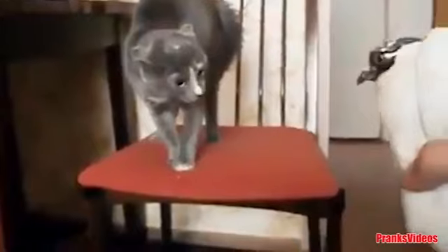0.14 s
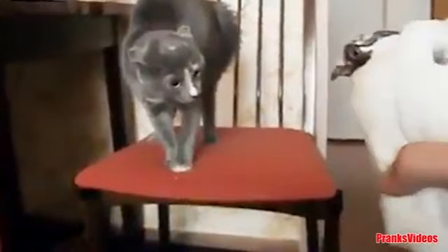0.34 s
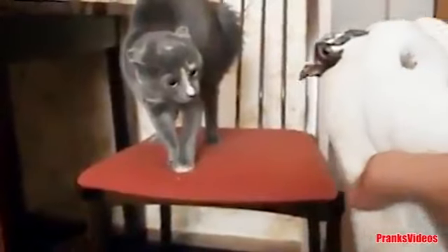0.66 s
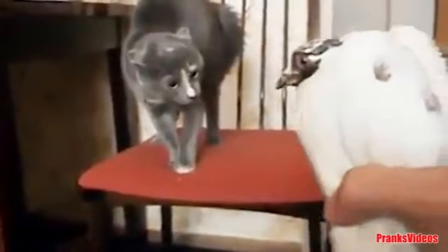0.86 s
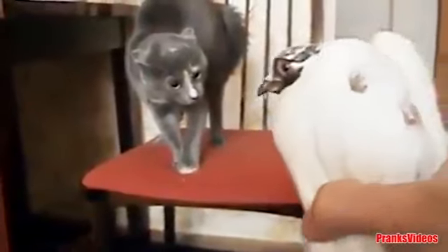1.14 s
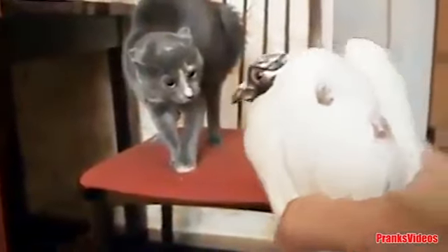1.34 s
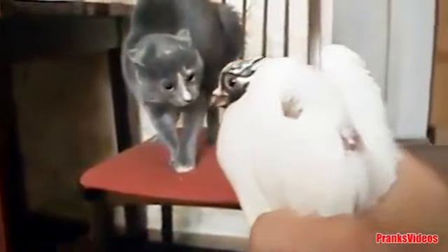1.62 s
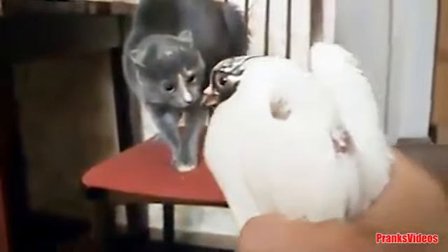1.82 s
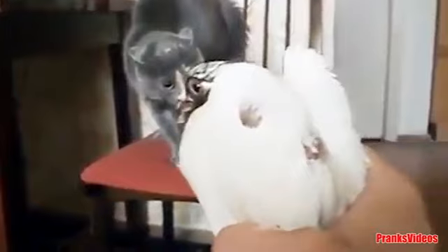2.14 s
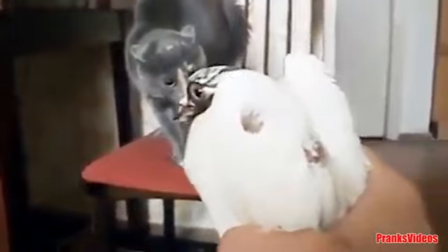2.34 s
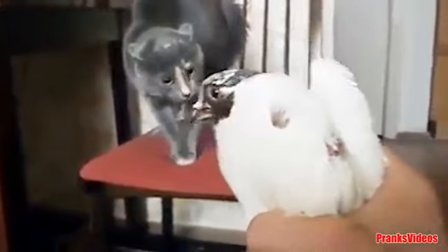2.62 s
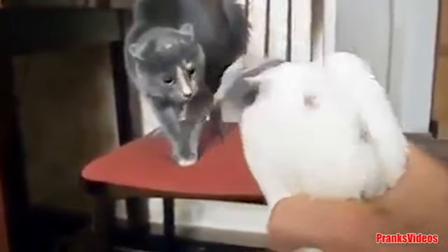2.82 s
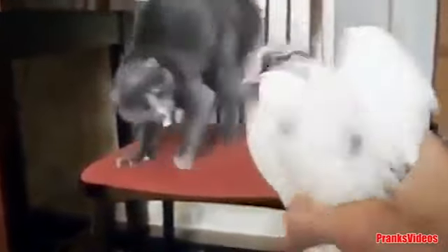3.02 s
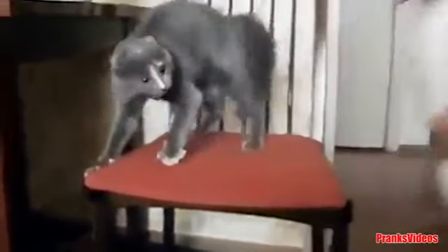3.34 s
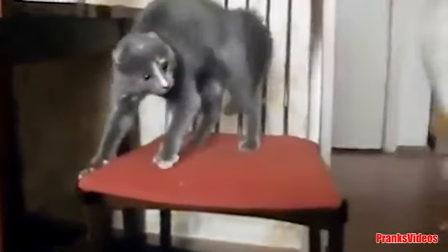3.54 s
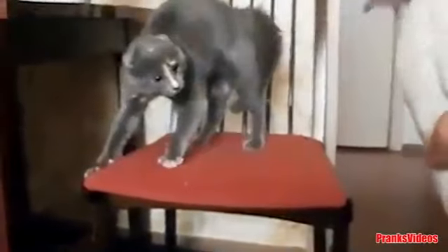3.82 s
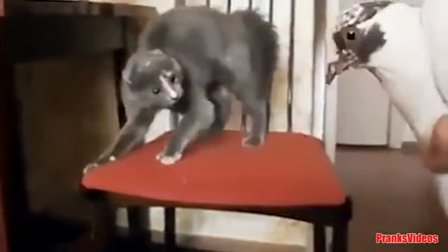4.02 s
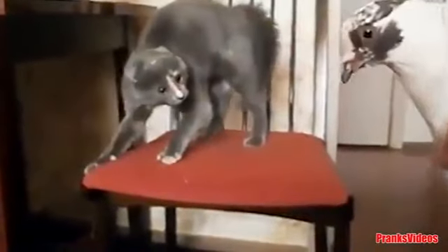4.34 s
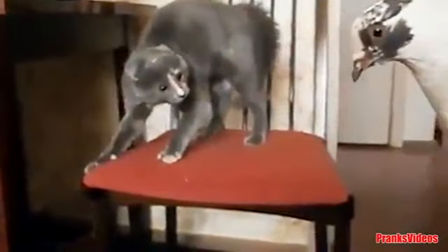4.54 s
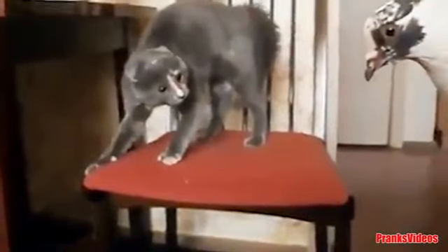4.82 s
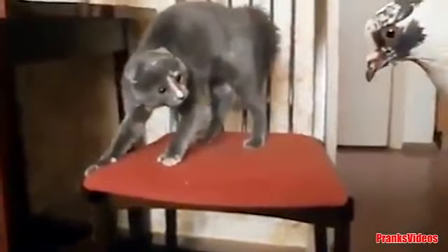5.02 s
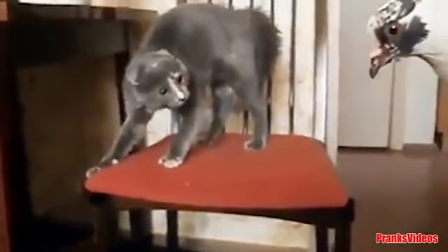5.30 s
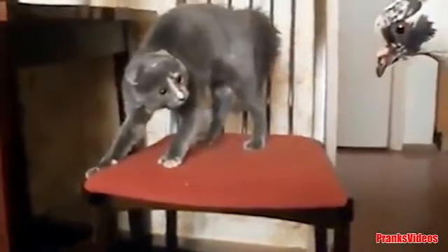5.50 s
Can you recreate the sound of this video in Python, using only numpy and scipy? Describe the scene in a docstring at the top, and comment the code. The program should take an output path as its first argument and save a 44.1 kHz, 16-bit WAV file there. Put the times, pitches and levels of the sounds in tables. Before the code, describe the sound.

A close indoor recording of an angry cat, through a cheap, band-limited microphone with gritty treble, a short room echo and a faint low background with soft handling rumble. After a tiny silence, from 0.1 s the cat gives a thin, tense, drawn-out moan around 450 Hz, rising slightly near 1 s, then sagging and breaking off in a few creaky croaks at 1.6 s. Only room noise remains until a faint paw tap at 2.6 s and a light scuff at 3.0 s. At about 3.15 s comes the loudest moment: an explosive, breathy spit with hiss and several sharp, clacking paw swats, slightly overloaded. A harsh high shriek follows at 3.25 s, tumbling by 3.65 s into a lower yowl. Around 4.06 s it flips up into a raspy yelp, then from 4.3 s slides down through a long, rough, beating wail, still sounding as it ends near 5.7 s.

```python
"""Cat defending itself in a small room

A cat moans, falls silent, then scuffs, spits, swats and breaks into a shriek, which drops to a yowl, flips up
in a yelp and slides down into a long, beating wail. The calls are sums of vocal-fold harmonics; the spit is
an unsteady mouth tone with hiss; the paws are bursts of shaped noise. A room tail and low background noise
are added, and a narrow-band channel with mirrored treble and an overload knee carries the whole."""
import sys
import numpy as np
from scipy import signal
from scipy.fft import rfft, irfft, next_fast_len
from scipy.io import wavfile

SR = 44100
rng = np.random.default_rng(int(sys.argv[2]) if len(sys.argv) > 2 else 0)


def pcm_store(signal):
    """Save signal as 16-bit PCM."""
    levels = np.round(np.clip(np.atleast_2d(signal), -1, 1) * 32767)
    wavfile.write(sys.argv[1], SR, levels.astype(np.int16).T)


N = 250047
TIME = np.arange(N) / SR

# Background noise spectrum. Each row: frequency in Hz, relative level in dB.
AIR_SPECTRUM = [(20, -18.5), (33, -8.5), (48, -10), (100, -4), (165, -1.5), (350, -1), (600, -4.5),
                (850, -2.5), (1300, -4), (1900, -12), (2700, -13), (3600, -15.5), (4500, -17), (6000, -59)]
# Background noise, sinking around the shriek and returning. Each row: time in s, level in dB above AIR_DB.
AIR_LEVEL = [(0, 2.5), (3.12, 1), (3.25, -5.5), (3.6, -12), (4.0, -1), (4.45, -3), (4.8, -1), (5.67, 0)]
AIR_DB = -45
# Faint handling rumble. Each row: time in s, level in dB.
RUMBLE_LEVEL = [(0.09, -47.5), (0.6, -50), (1.0, -52), (3.3, -58.5), (4.4, -55.5), (4.9, -51.5),
                (5.25, -51.5), (5.6, -53.5)]
# Rumble spectrum. Each row: frequency in Hz, relative level in dB.
RUMBLE_SPECTRUM = [(20, -22.5), (45, 1.5), (65, 5.5), (85, -3.0), (130, -37.5), (400, -64.5)]

# Paws scuffing and swatting. Each row: start in s, scuff level in dB before rise and decay, rise in s,
# decay time constant in s, thud level in dB relative to the scuff.
PAW_CONTACTS = [(2.569, -44.5, 0.01, 0.019, 9), (2.979, -31, 0.055, 0.078, -23.5),
                (3.058, -24, 0.0071, 0.031, -30), (3.083, -38, .006, 0.13, -23.5),
                (3.145, -12, .002, 0.011, 5.5), (3.165, -10, 0.0013, 0.0085, -1.5),
                (3.18, -12.5, 0.0018, 0.0049, 7.5)]
# Scuff spectrum. Each row: frequency in Hz, relative level in dB.
SCUFF_SPECTRUM = [(100, -9.5), (400, -3), (900, 2), (1500, 1), (2100, -10.5), (2800, -6), (4000, -8.5),
                  (6000, -40.5)]
# Thud spectrum. Each row: frequency in Hz, relative level in dB.
THUD_SPECTRUM = [(25, -15.5), (60, 0.5), (100, -6.5), (160, -1.0), (260, -8), (450, -6.5), (750, -2.5),
                 (1100, -3.5), (4000, -64.5)]

# The spit: a burst, and a hiss that outlasts it.
SPIT_S, BURST_DB, TEETH_DB = 3.138, -4.5, -11.5
# The centre of the mouth resonance rises as the jaw opens.
JAW_OPENS_S, JAW_TRAVEL_S = 3.165, 0.11
MOUTH_FROM_HZ, MOUTH_TO_HZ = 1400, 2102
# Hiss past the teeth. Each row: frequency in Hz, relative level in dB.
TEETH_SPECTRUM = [(200, -27.0), (800, -14.5), (1450, -7), (1900, 2.0), (2500, 5.5), (3300, 2.5), (4200, -9),
                  (6000, -43.5)]

# Calls in the low register, before trim, tilt and unsteadiness. Each row: time in s, pitch in Hz,
# level of the second harmonic in dB, joint level of harmonics 4 to 8 in dB.
MOAN_PATH = [(0.087, 448.0, -30.5, -56.5), (0.189, 452, -30, -56), (0.225, 451.5, -30, -46),
             (0.377, 454, -29.5, -56.5), (0.491, 434, -13.5, -45), (0.569, 459, -23, -43),
             (0.689, 450.0, -23.5, -41), (0.795, 462.4, -24, -37.5), (0.833, 468.7, -24.5, -50.5),
             (0.971, 484.4, -17, -44), (1.173, 476.5, -29, -49), (1.287, 468.6, -27.5, -51),
             (1.311, 459.8, -21, -39.5), (1.411, 444.4, -17.5, -37.5), (1.435, 441.5, -11.5, -41),
             (1.521, 430.2, -14.5, -37.5), (1.545, 411.3, -16, -66.5), (1.56, 403, -21, -41)]
YOWL_PATH = [(3.645, 706.6, -38.5, -51), (3.667, 688, -25.5, -41.5), (3.691, 632.6, -44.5, -34.5),
             (3.835, 612, -26, -32), (3.921, 654, -33.5, -42.5), (4.021, 645.4, -32, -34.5),
             (4.041, 678, -11.5, -27.5), (4.065, 716, -11, -29.5)]
WAIL_PATH = [(4.275, 840, -17, -41.5), (4.305, 739.7, -20, -27), (4.387, 737.3, -16, -32),
             (4.511, 651, -15.5, -29), (4.549, 654.8, -31.5, -30), (4.689, 587, -25, -36.5),
             (4.713, 544.5, -29, -37), (4.737, 572.7, -24.5, -40.5), (4.791, 561, -13, -34),
             (4.813, 570.7, -21.5, -38.5), (4.853, 565.2, -16.5, -30), (4.941, 531, -21.5, -37.5),
             (5.051, 510.4, -10.5, -26.5), (5.191, 505.8, -19.5, -39.5), (5.283, 480.7, -20.5, -33.5),
             (5.455, 460.7, -19, -43.5), (5.543, 474.1, -24.5, -35), (5.67, 471.3, -16.5, -33.5)]
# Calls in the high register, likewise. Each row: time in s, pitch in Hz, joint level of 3 harmonics in dB.
SHRIEK_PATH = [(3.25, 1328, -14), (3.292, 1340, -12.5), (3.4, 1295, -13), (3.44, 1199, -18.5),
               (3.49, 1206, -18), (3.554, 1151, -31), (3.6, 939.3, -26), (3.645, 841, -31)]
YELP_PATH = [(4.06, 892, -14.5), (4.084, 1082, -13), (4.126, 1150, -14), (4.17, 1182, -15),
             (4.224, 1074, -19), (4.268, 919, -17.5), (4.285, 802, -22.5)]
# Throat response for the upper harmonics, mouth nearly shut and mouth open.
# Each row: frequency in Hz, relative gain in dB.
SHUT_THROAT = [(1750, -15.5), (2000, -9.5), (2250, -24.5), (2420, -2), (2600, 0), (2740, 6), (2840, -12),
               (2930, -22), (3300, -28), (4500, -27)]
OPEN_THROAT = [(1850, -12), (2080, 0.5), (2300, -5), (2550, 4), (2800, -12.5), (3100, -17.5), (3400, -23.5),
               (3700, -25.5), (5000, -35.5)]
# Throat response in the high register, mouth wide open. Each row: frequency in Hz, relative gain in dB.
SHRIEK_THROAT = [(850, -4), (1300, -1.5), (1750, -6), (2250, 0), (2480, 2), (2700, 3.5), (3350, -4.5),
                 (3650, 3), (4000, -0.5)]
YELP_THROAT = [(850, -13), (1050, 2), (1180, -3.5), (1700, 8.5), (2100, -0.5), (2350, 0.5), (2600, -6),
               (3100, -4), (3480, 4)]
# Resonances met by the gliding first and third harmonics. Each row: frequency in Hz, level in dB
# (the third is further offset per call).
WEAK_HARMONICS = [(410, -35), (455, -35), (478, -32.5), (510, -48.5), (560, -34), (610, -54), (645, -41),
                  (760, -42.5), (1300, -34.5), (1430, -31.5), (1550, -39.5), (1750, -43), (2200, -39.5)]
# Air rushing through the throat. Each row: frequency in Hz, relative level in dB.
THROAT_AIR_SPECTRUM = [(400, -41), (800, -23.5), (1100, 5.5), (1600, 7.5), (2000, -10), (2400, 2),
                       (2900, -11), (3600, -12), (4500, -23)]
# Sudden catches and surges of the voice. Each row: centre in s, level change in dB,
# pitch change as a share, half-width to 1/e in s.
VOICE_CATCHES = [(1.544, -2.5, -0.013, 0.0038), (3.297, 3.5, -.04, .004), (3.308, 0, -.11, .008),
                 (3.367, 4.5, -.02, .009), (4.06, 5.5, 0, 0.0022), (4.27, -4.5, 0, .008),
                 (4.283, 3.5, .017, .0045), (4.425, -6, 0, 0.0052), (4.507, 2.5, 0, .005),
                 (4.833, -5.5, .03, .0064), (4.849, 1.5, 0, 0.0067)]
# Spells of uneven fold vibration. Each row: start in s, end in s, roughness added to the call's own,
# depth of a second vibration before the call's beat factor, its mean rate in Hz.
ROUGH_SPELLS = [(0.069, 0.402, 0.06, 0.23, 60.14), (0.563, 1.33, 0.02, .24, 60),
                (1.552, 1.603, .5, 0.8, 69.3), (3.182, 3.274, .75, 0.5, 430.7),
                (3.28, 3.414, 0.04, 0.37, 417.4), (3.485, 3.566, .85, .5, 525),
                (3.565, 3.647, .28, 0.02, 480), (4.062, 4.086, 0.4, 0.03, 411),
                (4.15, 4.195, .27, 0.38, 468), (4.2, 4.301, .15, 0.05, 251), (4.515, 4.64, .06, 0.5, 187.9),
                (4.64, 4.764, .15, .8, 129.6), (4.755, 4.93, .09, 0.41, 136),
                (5.217, 5.697, 0.04, 0.05, 99.3)]
SPELL_EDGE_S = .014
SHIMMER_DB, SHIMMER_HZ = 2, 17  # all harmonics but the second drift in level on their own
# Single flaps of the folds as the moan breaks off. Each row: time in s, level in dB.
CROAK_FLAPS = [(1.553, -21.5), (1.563, -17), (1.588, -31.5)]
# Throat resonances that the flaps ring. Each row: frequency in Hz, relative level in dB, decay constant in s.
CROAK_MODES = [(373, -9.5, 0.018), (835, -3.5, 0.014), (2640, -12, 0.0067)]

ROOM_WET_DB = -10.5
START_S = .086  # silence before this
CONVERTER_HZ, TOP_HZ = 8000, 15700
# Band limits before and after the mirroring. Each row: frequency in Hz, gain in dB.
BAND_BEFORE = [(3500, 0.5), (4000, -1.5), (4400, -13.0), (5000, -73.5), (6000, -100)]
BAND_AFTER = [(3600, 0), (4000, -5.0), (4400, -12.0), (4750, -24), (5100, -41.5), (5800, -100)]


def undb(db):
    """Logarithmic level: decibels to amplitude gain."""
    return 10 ** (np.asarray(db) / 20)


def curves(rows):
    """Linear interpolation: each column of a table joined by straight lines in time."""
    s, *columns = np.transpose(rows)
    return [np.interp(TIME, s, c) for c in columns]


def gain_at(hz, points):
    """Spectral envelope: gain of (Hz, dB) points, interpolated on a logarithmic frequency axis."""
    f, db = np.transpose(points)
    return undb(np.interp(np.log(hz + 1e-3), np.log(f), db))


def unit(x):
    """Normalisation: scale to rms 1."""
    return x / np.sqrt(np.mean(x ** 2))


def shaped(x, response):
    """Linear filtering: multiply the spectrum by a gain given as a function of frequency."""
    size = next_fast_len(N + SR // 10)
    spectrum = rfft(x, size) * response(np.fft.rfftfreq(size, 1 / SR))
    return irfft(spectrum, size)[:N]


def noise(points):
    """Coloured noise: white noise filtered to a (Hz, dB) spectrum, at rms 1."""
    return unit(shaped(rng.standard_normal(N), lambda f: gain_at(f, points)))


def flutter(hz, size=32768):
    """Low-passed random modulation: rms 1, moving at up to about the given rate."""
    f = np.fft.rfftfreq(size, TIME[-1] / size)
    coarse = irfft(rfft(rng.standard_normal(size)) / (1 + (f / hz) ** 2))
    return np.interp(TIME, np.linspace(0, TIME[-1], size), unit(coarse))


def angle(hz):
    """Phase accumulation: the running integral of a moving frequency."""
    return 2 * np.pi * np.cumsum(hz) / SR


def envelope(start_s, attack_s, hold_s, fall_db_per_s):
    """Exponential decay: straight attack, hold, then a steady fall in dB."""
    age = TIME - start_s
    fall_s = np.maximum(age - attack_s - hold_s, 0)
    return np.clip(age / attack_s, 0, 1) * undb(-fall_db_per_s * fall_s)


def window(start_s, end_s, edge_s):
    """Gating: 1 between two times, with sloping edges centred on them."""
    return np.clip(np.minimum(TIME - start_s, end_s - TIME) / edge_s + .5, 0, 1)


def air():
    """Stationary broadband noise: a slowly varying background over a faint low-frequency handling rumble."""
    level_db, = curves(AIR_LEVEL)
    rumble_db, = curves(RUMBLE_LEVEL)
    background = noise(AIR_SPECTRUM) * undb(AIR_DB + level_db + .5 * flutter(16))
    return background + noise(RUMBLE_SPECTRUM) * undb(rumble_db)


def room(x, t60_s, wet_db, bass_hz, treble_hz):
    """Reverberation: walls and furniture return a decaying diffuse tail with little bass and a dull top."""
    age = TIME[:SR // 2]
    decay = np.exp(-np.log(1000) * age / t60_s)  # 60 dB down at t60_s
    tail = rng.standard_normal(len(age)) * decay * (age > .006)
    echo = signal.fftconvolve(x, tail / np.linalg.norm(tail))[:N]
    colour = lambda f: f ** 2 / (f ** 2 + bass_hz ** 2) / np.hypot(1, f / treble_hz)
    return x + undb(wet_db) * shaped(echo, colour)


def paws():
    """Contact noise: each touch is a short, damped scuff together with a dull thud."""
    scuff, thud = noise(SCUFF_SPECTRUM), noise(THUD_SPECTRUM)
    out = 0
    for s, db, rise_s, decay_s, thud_db in PAW_CONTACTS:
        age = np.maximum(TIME - s, 0)
        shape = np.minimum(age / rise_s, 1) * np.exp(-age / decay_s)
        out = out + undb(db) * shape * (scuff + undb(thud_db) * thud)
    return out


def spit():
    """Turbulent excitation: a burst drives a chaotic tone in the opening mouth, with hiss past the teeth."""
    jaw_s = [JAW_OPENS_S, JAW_OPENS_S + JAW_TRAVEL_S]
    mouth_hz = np.interp(TIME, jaw_s, [MOUTH_FROM_HZ, MOUTH_TO_HZ])
    tone = np.cos(angle(mouth_hz * (1 + .16 * flutter(1075))))
    mouth = unit((1 + 0.088 * flutter(380)) * tone)
    burst = envelope(SPIT_S, attack_s=.009, hold_s=0.026, fall_db_per_s=277.5)
    hiss = envelope(SPIT_S, attack_s=0.02, hold_s=.05, fall_db_per_s=128.5)
    return undb(BURST_DB) * burst * mouth + undb(TEETH_DB) * hiss * noise(TEETH_SPECTRUM)


def catches():
    """Transient modulation: brief Gaussian bumps in level (dB) and pitch (share)."""
    s, db, bend, width_s = np.transpose(VOICE_CATCHES)
    distance = (TIME - s[:, None]) / width_s[:, None]
    bumps = np.exp(-np.minimum(distance ** 2, 50))
    return db @ bumps, bend @ bumps


def folds():
    """Irregular oscillation: added roughness of the folds, and depth and rate (Hz) of a second vibration."""
    spells = np.array([window(start, end, SPELL_EDGE_S) for start, end, *_ in ROUGH_SPELLS])
    _, _, rough, depth, hz = np.transpose(ROUGH_SPELLS)
    return rough @ spells, depth @ spells, hz[spells.argmax(axis=0)]


def low_register(rows, throat, third_db):
    """Source and filter: the first three harmonics are set singly, the upper ones glide through the throat."""
    hz, second_db, treble_db = curves(rows)
    first = gain_at(hz, WEAK_HARMONICS)
    third = undb(third_db) * gain_at(3 * hz, WEAK_HARMONICS)
    upper = np.array([gain_at(k * hz, throat) for k in range(4, 9)])
    upper = upper * undb(treble_db) / np.linalg.norm(upper, axis=0)
    return rows, hz, [first, undb(second_db), third, *upper]


def high_register(rows, throat):
    """Source and filter: three harmonics share the level through the wide-open mouth."""
    hz, db = curves(rows)
    gains = np.array([gain_at(k * hz, throat) for k in range(1, 4)])
    return rows, hz, gains * undb(db) / np.linalg.norm(gains, axis=0)


def voice(register, edge_s, base_rough, waver, jitter, rasp, beat, chop_db, hiss_db, trim_db, tilt_db):
    """Nonlinear phonation: fold harmonics shaken by jitter, turbulence and a second vibration."""
    rows, hz, gains = register
    rough, depth, second_hz = folds()
    rough = np.clip(base_rough + rough, 0, 1)
    depth = beat * np.clip(depth, 0, 1)
    surge_db, bend = catches()
    # unsteady folds waver slowly and jitter quickly
    slow = waver * np.sqrt(rough) * flutter(22)
    quick = jitter * rough * flutter(240.6)
    phase = angle(hz * (1 + bend + slow + quick))
    gains = [gain * undb(tilt_db * k) for k, gain in enumerate(gains)]
    # the second vibration puts a side tone below each harmonic
    side_tones = depth * np.exp(-1j * angle(second_hz * (1 + .085 * flutter(45))))
    # rough folds leak more air
    out = undb(hiss_db) * rough * np.linalg.norm(gains, axis=0) * noise(THROAT_AIR_SPECTRUM)
    for k, gain in enumerate(gains, 1):
        share = .17 if k == 1 else 1  # the fundamental takes least of the side tone
        smear = rasp * rough * (k / 2) ** 1.72  # higher harmonics dissolve first
        turbulence = smear * (flutter(91) + 1j * flutter(130))
        wobble = (1 + share * side_tones + turbulence) / np.sqrt(1 + 2 * smear ** 2)
        drift = 1 if k == 2 else undb(SHIMMER_DB * flutter(SHIMMER_HZ))
        out = out + gain * drift * np.real(wobble * np.exp(1j * k * phase))
    gate = window(rows[0][0], rows[-1][0], edge_s)
    chop = chop_db * np.sqrt(rough) * flutter(100)
    return np.sqrt(2) * undb(trim_db + surge_db + chop) * gate * out


def croaks():
    """Impulse response: each flap of the folds rings the damped modes of the nearly shut throat."""
    out = 0
    for s, db in CROAK_FLAPS:
        age = np.clip(TIME - s, 0, 1)
        for hz, mode_db, decay_s in CROAK_MODES:
            ring = np.exp(-age / decay_s) * np.sin(2 * np.pi * hz * age)
            out = out + undb(db + mode_db) * ring
    return out


def cat():
    """Register transition: the calls follow in turn, flipping between low and high vibration of the folds."""
    moan = voice(low_register(MOAN_PATH, SHUT_THROAT, third_db=-15), edge_s=0.0058, base_rough=.012,
                 waver=0.06, jitter=0.074, rasp=0.29, beat=0.95,
                 chop_db=4.5, hiss_db=-22.5, trim_db=-.5, tilt_db=0)
    shriek = voice(high_register(SHRIEK_PATH, SHRIEK_THROAT), edge_s=0.021, base_rough=.12,
                   waver=0.022, jitter=.056, rasp=0.58, beat=0.88,
                   chop_db=2.5, hiss_db=-9, trim_db=-0.5, tilt_db=-2)
    yowl = voice(low_register(YOWL_PATH, OPEN_THROAT, third_db=-6), edge_s=.006, base_rough=0.054,
                 waver=0.0072, jitter=0.027, rasp=.15, beat=.8,
                 chop_db=4.5, hiss_db=-9.5, trim_db=-1.0, tilt_db=1.5)
    yelp = voice(high_register(YELP_PATH, YELP_THROAT), edge_s=0.0082, base_rough=0.19,
                 waver=.025, jitter=.06, rasp=1.0, beat=1.4,
                 chop_db=2.0, hiss_db=-5.5, trim_db=-1.94, tilt_db=0.5)
    wail = voice(low_register(WAIL_PATH, OPEN_THROAT, third_db=1), edge_s=.0058, base_rough=0.034,
                 waver=0.01, jitter=.038, rasp=1.52, beat=0.58,
                 chop_db=3.5, hiss_db=-7.0, trim_db=-0.1, tilt_db=-0.5)
    return moan + croaks() + shriek + yowl + yelp + wail


def scene():
    """Superposition: the cat and its paws sound in the room, over the background."""
    sources = cat() + spit() + paws()
    reverberant = room(sources, t60_s=0.42, wet_db=ROOM_WET_DB, bass_hz=450, treble_hz=4670)
    return (reverberant + air())[None]


def overload(x, knee):
    """Saturation: linear below the knee, bending smoothly towards full scale above it."""
    over = np.maximum(np.abs(x) - knee, 0)
    return np.sign(x) * (np.abs(x) - over + (1 - knee) * np.tanh(over / (1 - knee)))


def record(dry):
    """Aliasing: a slow converter mirrors the treble about half its rate; the output flattens loud peaks."""
    band = shaped(dry[0], lambda f: gain_at(f, BAND_BEFORE))
    mirrored = band * (1 + 2 * np.cos(2 * np.pi * CONVERTER_HZ * TIME))
    smooth = shaped(mirrored * (TIME > START_S), lambda f: gain_at(f, BAND_AFTER))
    flattened = overload(smooth, knee=.78)
    low_pass = signal.ellip(8, .2, 70, TOP_HZ, fs=SR, output="sos")
    return signal.sosfilt(low_pass, flattened)[None]


dry = scene()
out = record(dry)
pcm_store(out)
```